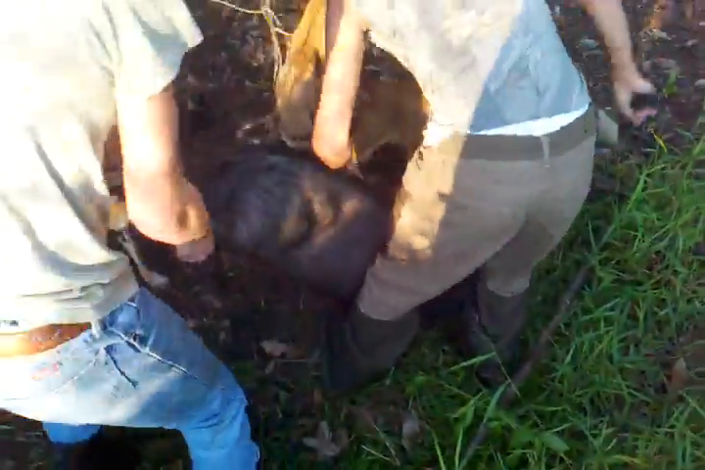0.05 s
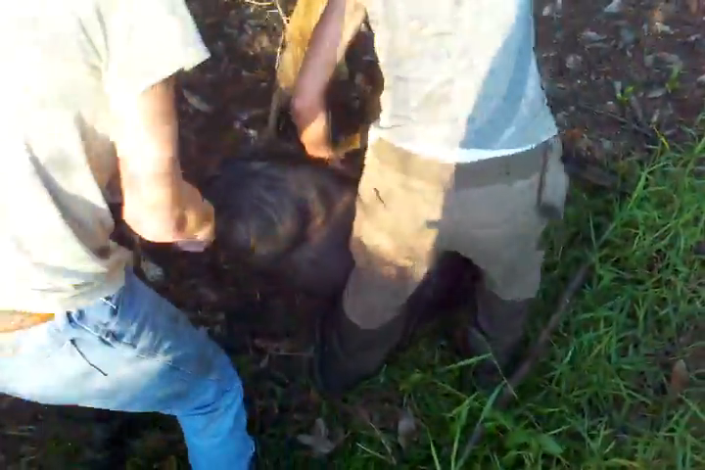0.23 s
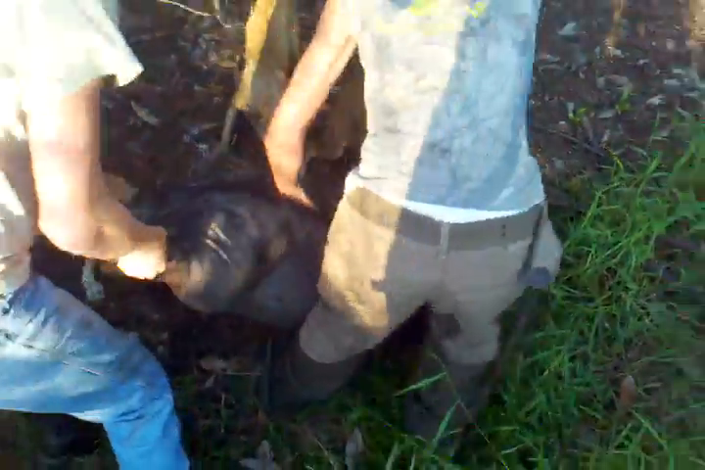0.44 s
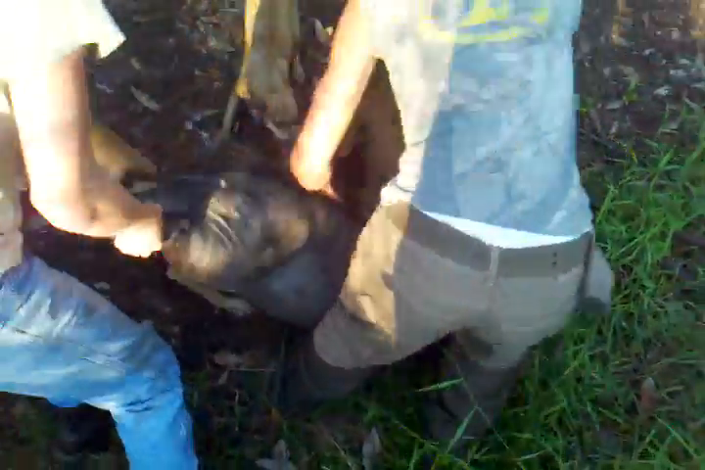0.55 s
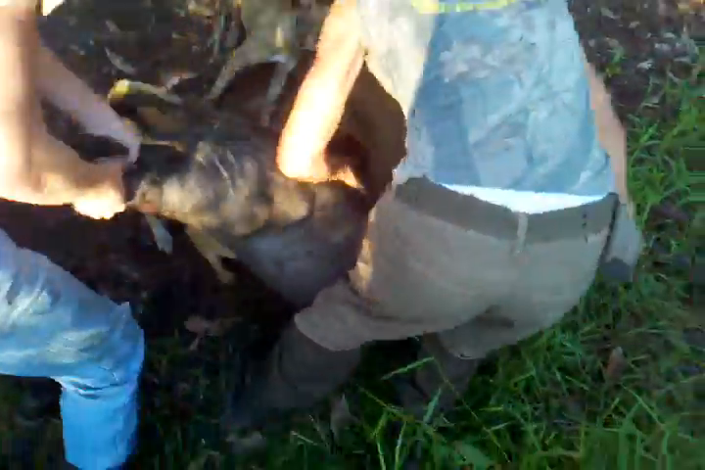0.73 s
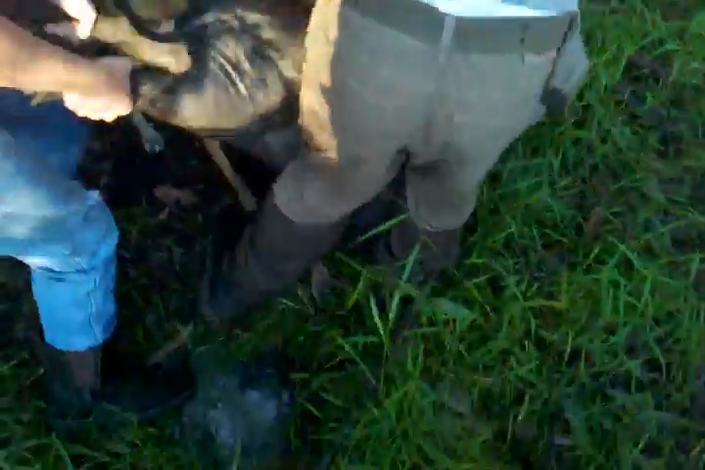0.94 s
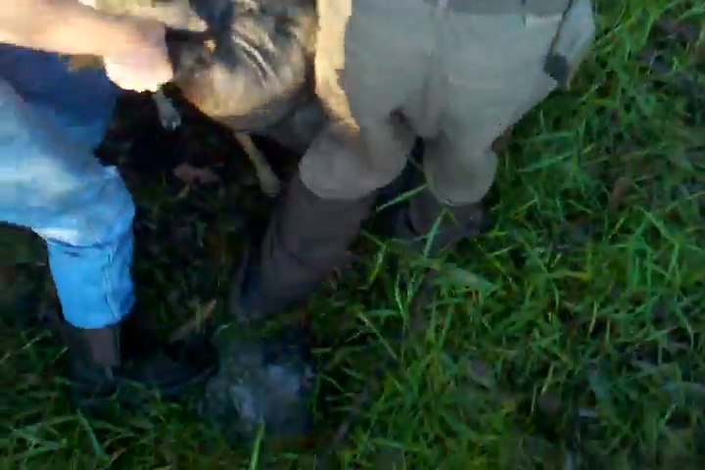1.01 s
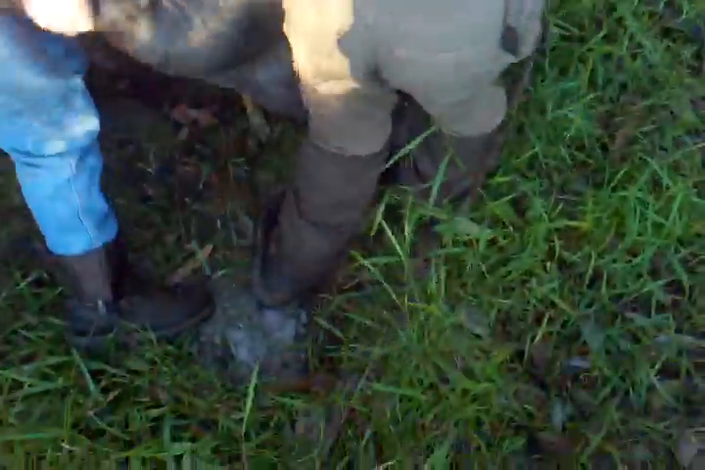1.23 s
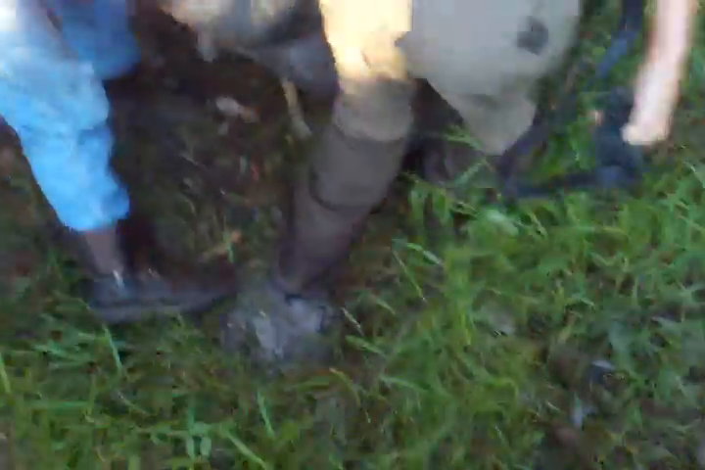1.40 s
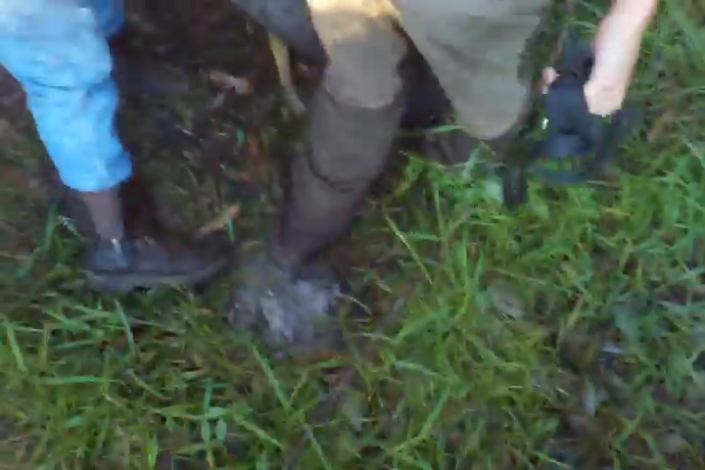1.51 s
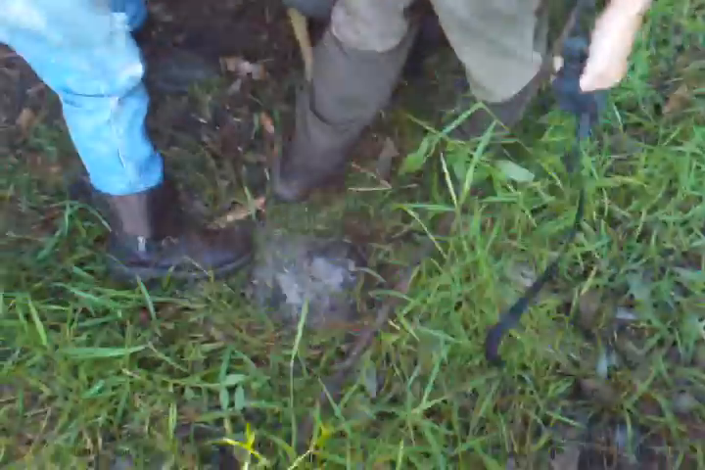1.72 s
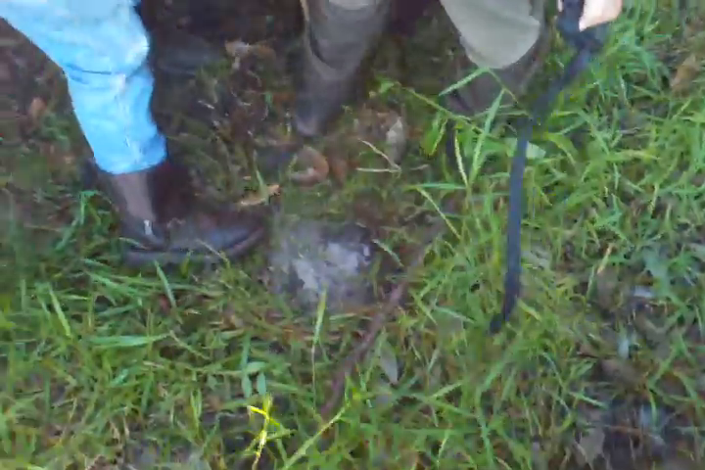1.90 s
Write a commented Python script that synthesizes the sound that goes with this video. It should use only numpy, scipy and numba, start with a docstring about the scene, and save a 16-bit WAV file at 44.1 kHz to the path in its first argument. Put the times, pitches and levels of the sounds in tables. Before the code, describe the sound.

Close outdoor stereo sound of a hog squealing: a shrill, rough, fluttering cry with breathy edges and brief low moans, rising slightly near its end, then sudden quiet with soft hiss, slight whine and ticks.

```python
"""Faint outdoor hiss comes first, then at once one long squeal: a hog held down in grass, close to a two-port microphone.
A high whistle of the vocal folds is chopped by a flutter locked to it; the same flutter gates a rasp of air
in the throat, mouth and upper resonances. A second tone, short moans and broad breath thicken the cry.
A few dull echoes follow it; a short whine and two ticks come at the end. All are shaped noise and sines."""
import sys
import numpy as np
from scipy import signal
from scipy.fft import rfft, irfft
from scipy.io import wavfile
from numba import njit

SR = 44100
rng = np.random.default_rng(int(sys.argv[2]) if len(sys.argv) > 2 else 0)


def generate_wav(signal):
    """Clip the signal to [-1, 1] and save it as 16-bit WAV at the path in sys.argv[1]."""
    frames = np.transpose(np.atleast_2d(signal))
    scaled = np.clip(frames, -1, 1) * 32767
    pcm = np.round(scaled).astype(np.int16)
    wavfile.write(sys.argv[1], SR, pcm)


def to_linear_factor(level_db):
    """Convert decibel levels (scalar or array-like) to linear amplitude factors."""
    exponent = np.asarray(level_db, float) / 20
    return 10 ** exponent


N = 85995

# outdoor hiss, spectrum shape: (frequency [Hz], relative level per Hz [dB])
HISS_SPECTRUM = [(60, -18), (150, 7), (300, 5), (800, 2), (1500, 7), (3000, -4), (5000, -1.5), (8000, 3.5),
                 (11000, -4), (14000, 1)]
# outdoor hiss, loudness before its slow swell: (time [s], level [dB])
HISS_LEVEL = [(0, -41.5), (.1, -39.5), (1.7, -45), (1.85, -48.5), (1.95, -49)]
# state of the folds: (time [s], noise share of the whistle's power [0-1], flutter depth [0-1],
# depth of strong-weak alternation [0-1])
FOLDS = [(0, .5, .2, .1), (.3, .3, .2, .05), (.53, .3, .4, .05), (.6, .2, .3, .1), (.64, .07, .08, .15),
         (.78, .12, .12, .15), (.85, .35, .25, .1), (1.0, .12, .24, 0), (1.27, .1, .18, 0),
         (1.35, .15, .08, .33), (1.43, .2, .1, .28), (1.52, .15, .15, .1), (1.59, .8, .25, .1)]
# throat resonance: (time [s], level before trim [dB], centre [Hz])
THROAT = [(0.04, -54.5, 590), (0.108, -26.5, 553), (0.192, -48, 570), (0.27, -43, 630), (0.826, -35.5, 600),
          (0.908, -29, 446), (0.954, -32, 510), (1.168, -29, 686.7), (1.264, -29, 741),
          (1.306, -31.5, 527.3), (1.356, -31.5, 705), (1.51, -29, 506.4), (1.556, -28, 810),
          (1.592, -42, 730), (1.672, -30.5, 801.8), (1.7, -67, 786.3)]
# mouth resonance above the whistle: (time [s], level before trim [dB], centre [Hz])
MOUTH = [(0.06, -80, 1920), (0.09, -34, 1840), (0.128, -22.5, 1840), (0.25, -29, 1650), (0.342, -21, 1776),
         (0.712, -21, 1716), (0.858, -21, 1830), (1.146, -29.5, 1600), (1.302, -23, 1831),
         (1.374, -20, 1619), (1.608, -24.5, 1630), (1.662, -20.5, 1661), (1.7, -84, 2020)]
# low strands near multiples of the flutter: (multiple of the flutter rate, level against STRAND_LEVEL [dB])
STRANDS = [(2, -5.5), (3, -1), (3.5, -3.5), (4, -3.5), (5.3, 0.5), (6, 5)]
# shared level of the strands: (time [s], level [dB])
STRAND_LEVEL = [(.07, -60), (.12, -46), (.3, -39.5), (.55, -39.5), (.68, -42), (.85, -37), (1.0, -34),
                (1.2, -36), (1.4, -35), (1.56, -38.5)]
# two upper resonances, before their swell:
# (time [s], lower level [dB], lower centre [Hz], top level [dB], top centre [Hz])
UPPER = [(0.08, -64, 4900, -64, 7460), (0.138, -43, 3970, -40.5, 7450), (0.34, -33, 4230, -35, 7600),
         (0.412, -40, 3950, -39, 7800), (0.54, -30.5, 4330, -32, 6800), (0.552, -32, 4070, -29, 7076),
         (0.674, -41.5, 4120, -29, 7400), (0.72, -32, 4100, -35, 6830), (0.874, -31, 4610, -28.5, 7560),
         (0.896, -38.5, 4745, -33, 7660), (0.996, -34, 4140, -30.5, 7400), (1.19, -36, 4190, -33, 7200),
         (1.27, -41, 4736, -28, 7800), (1.328, -32.5, 3850, -29.5, 7607), (1.374, -66, 4600, -32, 8500),
         (1.528, -41, 4710, -31.5, 6840), (1.572, -28, 4564, -31, 7680), (1.636, -65, 4510, -35, 7070),
         (1.654, -32, 4298, -33, 7018), (1.7, -78, 4188, -71, 7176)]
# narrow whistling edges in the breath: (mean centre [Hz], level against the top resonance before swell [dB])
EDGES = [(3400, -2.5), (4800, -9), (5400, -5), (6500, -3.5), (8300, -2.5)]
# broad breathiness of the cry, spectrum shape: (frequency [Hz], relative level per Hz [dB])
BREATH_SPECTRUM = [(90, -49), (200, 5.5), (500, 0.5), (1100, -10), (2300, 10), (3200, 6.5), (3750, -13.5),
                   (4500, -14), (5800, 6.5), (8500, 3.5), (9500, 4), (14000, -5)]
# broad breath, loudness: (time [s], level before BREATH_TRIM_DB [dB])
BREATH_LEVEL = [(.09, -83), (.125, -43.5), (.18, -42.5), (.45, -40.5), (.614, -35.5), (.75, -37.5),
                (.9, -42), (1.1, -40), (1.33, -38.5), (1.45, -40.5), (1.6, -35), (1.662, -38.5),
                (1.68, -78)]
# whistle of the folds: (time [s], pitch before waver [Hz], level [dB], octave level [dB])
WHISTLE = [(.09, 1309, -54, -44), (.17, 1321, -38, -34), (.26, 1329, -46, -42), (.3, 1324, -31, -35),
           (.33, 1348, -20.5, -51), (.37, 1325, -27, -39), (.47, 1332, -29.5, -34), (.52, 1330, -27, -25),
           (.58, 1300, -21.5, -29), (.62, 1290, -20.5, -27), (.655, 1323, -11, -25.5),
           (.7, 1325, -16.5, -30), (.745, 1295, -15, -38), (.8, 1337, -21, -43), (.825, 1353, -30, -31),
           (.855, 1376, -15, -26), (.895, 1405, -18.5, -32), (.925, 1379, -22, -27),
           (.97, 1375, -14, -26.5), (1.03, 1395, -10, -28), (1.11, 1393, -18, -26.5),
           (1.17, 1384, -16, -26.5), (1.21, 1405, -9.5, -19.5), (1.26, 1461, -15, -21.5),
           (1.32, 1437, -11.5, -34), (1.38, 1396, -11, -32), (1.42, 1440, -13.5, -35),
           (1.45, 1425, -14, -37), (1.485, 1434, -10, -28), (1.525, 1432, -19.5, -28),
           (1.56, 1468, -23, -34), (1.6, 1519, -17, -38), (1.63, 1391, -16, -30), (1.66, 1247, -21, -26),
           (1.68, 1155, -63, -53)]
# second, unsteady tone of the folds: (time [s], pitch before waver [Hz], level [dB])
SECOND = [(.1, 1510, -56), (.14, 1518, -23.5), (.2, 1487, -26), (.26, 1567, -32), (.3, 1725, -27.5),
          (.35, 1720, -21), (.42, 1705, -23), (.49, 1760, -28), (.53, 1714, -21), (.58, 1610, -16.5),
          (.67, 1594, -31), (.72, 1744, -25), (.79, 1732, -27), (.84, 1826, -34), (.88, 1854, -23),
          (.95, 1861, -30), (1.05, 1923, -39), (1.22, 1787, -41), (1.3, 1884, -25), (1.36, 2070, -37),
          (1.55, 1668, -43), (1.61, 1659, -11), (1.66, 1479, -37), (1.69, 1400, -67)]
# short low moans: (start [s], length [s], pitch before wobble [Hz], peak level before trim [dB])
MOANS = [(0.116, 0.027, 1018, -26), (0.852, 0.021, 572, -25), (0.87, 0.1, 440, -28.5),
         (0.955, 0.077, 582, -26.5), (1.437, 0.1, 466, -33.5), (1.627, 0.058, 790, -37)]
# whine after the cry: (time [s], centre [Hz], level [dB])
WHINE = [(1.72, 760, -63), (1.77, 800, -58), (1.8, 840, -54), (1.85, 930, -61)]
# ticks: (time [s], level of the ringing at its start [dB], frequency [Hz])
TICKS = [(1.713, -33, 13060), (1.7808, -22.5, 9500)]
# echoes off ground and bodies: (delay [s], level of the dulled cry [dB])
ECHOES = [(.006, -29), (.017, -15)]
# the two ports favour sum and difference in turn: (frequency [Hz], difference against sum [dB])
PORTS = [(30, 14), (90, 4), (200, -10), (900, -12), (1450, -26), (1900, -10), (2400, 3), (2780, 9),
         (3000, 26), (3500, 8), (3900, -6), (4450, -20), (5000, 0), (5850, 10), (6500, 1), (7350, -8),
         (8000, -1), (8800, 5), (9600, 0), (10300, -5), (11000, 1), (11800, 6), (12600, 0), (13300, -5),
         (14000, -3)]
# how far the difference is tied to the sum: (frequency [Hz], linked share of amplitude [dB])
PORT_LINK = [(100, -39), (280, -12), (400, -42), (1600, -32), (2300, -4), (3000, -61)]

WHISTLE_PER_FLUTTER = 7  # the whistle locks to the seventh multiple of the flutter
FLUTTER_JITTER = .13  # cycles, rms
OPEN_POWER = 1.6  # higher makes each opening of the folds briefer
SWELL_DB, SWELL_HZ = .5, 30  # rms spread and rate of the chop's swell
WAVER, WAVER_HZ = .008, 50  # rms share of the pitch and rate, for both tones of the folds
THROAT_PULSES, MOUTH_PULSES, UPPER_PULSES = .5, .36, .06  # amplitude weight of pulses in each rasp
# widths of a single resonance pass [Hz]
THROAT_WIDTH_HZ, MOUTH_WIDTH_HZ, STRAND_WIDTH_HZ = 400, 600, 75
UPPER_WIDTH_HZ, TOP_WIDTH_HZ, EDGE_WIDTH_HZ = 380, 600, 220
HALO_WIDTH_HZ, SECOND_WIDTH_HZ = 170, 90
THROAT_TRIM_DB, MOUTH_TRIM_DB, BREATH_TRIM_DB, MOAN_TRIM_DB = -3, -.5, 10, .5
EDGE_WANDER, EDGE_SWELL_DB, TREBLE_SWELL_DB = .02, 2.2, 1.5  # rms share of the centre; rms dB
BREATH_FLICKER_DB = 2.2  # rms
THIRD_DB = -33  # third partial against the whistle
PORT_TURN = -.26  # phase of the difference [rad]
PREAMP_CEILING = .64  # height at which the preamp rounds off
LOW_CUT_HZ, HIGH_CUT_HZ = 130, 13950


def in_time(rows):
    """Columns of a table, joined by straight lines in time."""
    s, *columns = np.transpose(rows)
    return [np.interp(np.arange(N) / SR, s, column) for column in columns]


def rms_one(x):
    """Scales to rms 1."""
    return x / np.sqrt(np.mean(x ** 2) + 1e-20)


def at_hz(points):
    """A dB spectrum as gains on the FFT grid, joined over log frequency."""
    hz, db = np.transpose(points)
    grid_hz = np.arange(N // 2 + 1) * SR / N
    return to_linear_factor(np.interp(np.log(grid_hz + 1), np.log(hz), db))


def drift(rate_hz):
    """Slow random wander of rms 1: noise through two equal low-pass poles."""
    r = np.exp(-2 * np.pi * rate_hz / SR)
    wander = signal.lfilter([1], [1, -2 * r, r * r], rng.standard_normal(N + SR // 2))
    return rms_one(wander[SR // 2:])  # drop the filter's run-in


@njit
def sweep(x, c, r):
    """Two-pole resonance with a moving centre."""
    y = np.zeros(len(x))
    for i in range(2, len(x)):
        y[i] = x[i] - x[i - 2] + r * c[i] * y[i - 1] - r * r * y[i - 2]
    return y


def resonance(x, hz, width_hz):
    """The moving resonance applied twice to each row; each row leaves at rms 1."""
    c = 2 * np.cos(2 * np.pi * hz / SR)
    r = np.exp(-np.pi * width_hz / SR)
    return np.array([rms_one(sweep(sweep(row, c, r), c, r)) for row in x])


def sounding(rows):
    """1 within the time span of a table, fading to 0 over 44 ms outside it."""
    t = np.arange(N) / SR
    inside = np.minimum(t - rows[0][0], rows[-1][0] - t)
    return np.clip(1 + inside / 0.044, 0, 1)


def outdoor_hiss():
    """Shaped noise, independent in front and sideways, with a slow swell."""
    level_db, = in_time(HISS_LEVEL)
    noise = rfft(rng.standard_normal((2, N))) * at_hz(HISS_SPECTRUM)
    return to_linear_factor(level_db + drift(6.7)) * rms_one(irfft(noise, N))


def fold_flutter():
    """Folds flutter at a seventh of the whistle: gives its phase, the rate, chop, openings and air pulses."""
    hz, _, _ = in_time(WHISTLE)
    _, depth, alternation = in_time(FOLDS)
    phase = 2 * np.pi * np.cumsum(hz * (1 + WAVER * drift(WAVER_HZ))) / SR
    rate = hz / WHISTLE_PER_FLUTTER
    cycle = phase / (2 * np.pi * WHISTLE_PER_FLUTTER) + FLUTTER_JITTER * drift(25)
    strong_weak = 1 + alternation * np.sqrt(2) * np.cos(np.pi * cycle)
    opening = (.5 + .5 * np.cos(2 * np.pi * cycle)) ** OPEN_POWER
    clicks = np.diff(np.floor(cycle), prepend=0)  # one sample per new cycle
    pulses = rms_one(clicks * strong_weak * to_linear_factor(2 * drift(125)))
    flutter = 1 + depth * rms_one(opening - opening.mean())
    chop = rms_one(flutter * strong_weak * to_linear_factor(SWELL_DB * drift(SWELL_HZ))) * np.sqrt(2)
    return phase, rate, chop, opening, pulses


def rasp(opening, pulses, share=0):
    """Air through the folds: sharp pulses mixed with noise that swells at each opening."""
    noise = rms_one(rng.standard_normal((2, N)) * (1.4 + opening))
    return share * pulses + (1 - share) * noise


def throat(opening, pulses):
    """Pulsed rasp ringing in the low, moving throat resonance."""
    db, hz = in_time(THROAT)
    ring = resonance(rasp(opening, pulses, THROAT_PULSES), hz, THROAT_WIDTH_HZ)
    return to_linear_factor(db + THROAT_TRIM_DB) * sounding(THROAT) * ring


def mouth(opening, pulses):
    """Pulsed rasp ringing in the mouth resonance just above the whistle."""
    db, hz = in_time(MOUTH)
    ring = resonance(rasp(opening, pulses, MOUTH_PULSES), hz, MOUTH_WIDTH_HZ)
    return to_linear_factor(db + MOUTH_TRIM_DB) * sounding(MOUTH) * ring


def low_strands(rate, opening, pulses):
    """Narrow bands of rasp that follow multiples of the flutter rate."""
    db, = in_time(STRAND_LEVEL)
    out = np.zeros((2, N))
    for multiple, strand_db in STRANDS:
        strand = resonance(rasp(opening, pulses), multiple * rate, STRAND_WIDTH_HZ)
        out += to_linear_factor(db + strand_db) * strand
    return out * sounding(STRAND_LEVEL)


def upper_resonances(opening, pulses):
    """Rasp in two treble resonances, the top one edged with narrow wandering whistles; all swell together."""
    db, hz, top_db, top_hz = in_time(UPPER)
    top = resonance(rasp(opening, pulses, UPPER_PULSES), top_hz, TOP_WIDTH_HZ)
    for edge_hz, edge_db in EDGES:
        centre_hz = edge_hz * (1 + EDGE_WANDER * drift(3.9))
        edge = resonance(rasp(opening, pulses), centre_hz, EDGE_WIDTH_HZ)
        top += to_linear_factor(edge_db + EDGE_SWELL_DB * drift(7.9)) * edge
    lower = resonance(rasp(opening, pulses, UPPER_PULSES), hz, UPPER_WIDTH_HZ)
    swell = to_linear_factor(TREBLE_SWELL_DB * drift(7))
    return sounding(UPPER) * swell * (to_linear_factor(db) * lower + to_linear_factor(top_db) * top)


def breath(opening, pulses):
    """Broad shaped rasp whose bands, about 1 kHz wide up to 15 kHz, flicker apart."""
    spectrum = rfft(rasp(opening, pulses, UPPER_PULSES)) * at_hz(BREATH_SPECTRUM)
    bins = N // 2 + 1
    band = np.arange(bins) * 22 // bins
    air = np.zeros((2, N))
    for k in range(15):
        air += to_linear_factor(BREATH_FLICKER_DB * drift(9)) * irfft(spectrum * (band == k), N)
    level_db, = in_time(BREATH_LEVEL)
    return to_linear_factor(level_db + BREATH_TRIM_DB) * sounding(BREATH_LEVEL) * rms_one(air)


def whistle(phase, chop, opening, pulses):
    """Chopped sines of the folds at three partials; the lower two trade power with a halo of noise."""
    hz, db, octave_db = in_time(WHISTLE)
    rough, _, _ = in_time(FOLDS)
    out = to_linear_factor(db + THIRD_DB) * chop * np.sin(3 * phase) * np.ones((2, 1))
    for partial, level_db in ((1, db), (2, octave_db)):
        halo = resonance(rasp(opening, pulses), partial * hz, HALO_WIDTH_HZ)
        tone = chop * np.sin(partial * phase)
        out += to_linear_factor(level_db) * (np.sqrt(1 - rough) * tone + np.sqrt(rough) * halo)
    return out * sounding(WHISTLE)


def second_tone(chop, opening, pulses):
    """Another unsteady pitch of the folds, chopped alike and turning to noise as they roughen."""
    hz, db = in_time(SECOND)
    rough, _, _ = in_time(FOLDS)
    tone = chop * np.sin(2 * np.pi * np.cumsum(hz * (1 + WAVER * drift(WAVER_HZ))) / SR)
    noise = resonance(rasp(opening, pulses), hz, SECOND_WIDTH_HZ)
    return to_linear_factor(db) * sounding(SECOND) * (np.sqrt(1 - rough) * tone + np.sqrt(rough) * noise)


def moans():
    """Short low sines with wobbling pitch and flat-topped rise and fall."""
    t = np.arange(N) / SR
    out = np.zeros(N)
    for start, length, hz, db in MOANS:
        phase = 2 * np.pi * np.cumsum(hz * (1 + 0.01424 * drift(26))) / SR
        swell = np.sin(np.pi * np.clip((t - start) / length, 0, 1)) ** 0.19
        out += to_linear_factor(db + MOAN_TRIM_DB) * swell * np.sin(phase)
    return out


def hog():
    """The whole cry: the layers of voice and air, most of them driven by one flutter."""
    phase, rate, chop, opening, pulses = fold_flutter()
    out = throat(opening, pulses) + mouth(opening, pulses)
    out += low_strands(rate, opening, pulses)
    out += upper_resonances(opening, pulses)
    out += breath(opening, pulses)
    out += whistle(phase, chop, opening, pulses)
    out += second_tone(chop, opening, pulses)
    return out + moans()


def echoes(cry):
    """Ground and bodies return the cry late and dulled by a one-pole low-pass."""
    dull = signal.lfilter([.4], [1, -.6], cry)
    out = np.zeros((2, N))
    for delay, db in ECHOES:
        late = int(delay * SR)
        out[:, late:] += to_linear_factor(db) * dull[:, :N - late]
    return out


def whine():
    """Noise in a narrow resonance gliding in pitch."""
    hz, db = in_time(WHINE)
    return to_linear_factor(db) * sounding(WHINE) * resonance(rng.standard_normal((2, N)), hz, 90)


def ticks():
    """Tiny impacts: a high sine with noise, both dying away within milliseconds."""
    t = np.arange(N) / SR
    out = np.zeros(N)
    for start, db, hz in TICKS:
        age = np.maximum(t - start, 0)
        ring = np.sin(2 * np.pi * hz * age) + 0.44 * rng.standard_normal(N)
        out += to_linear_factor(db) * (t >= start) * np.exp(-age / 0.00039) * ring
    return out


def scene():
    """Hiss, hog, echoes, whine and ticks; frontal and sideways rows share tones but not noise."""
    cry = hog()
    return outdoor_hiss() + cry + echoes(cry) + whine() + ticks()


def roll_off(x):
    """The treble ends steeply here."""
    return signal.sosfilt(signal.butter(12, 15290, fs=SR, output="sos"), x)


def record(dry):
    """Ports take front as sum and sideways as difference, by frequency; peaks are rounded, both ends cut."""
    front, sideways = rfft(dry)
    ratio = at_hz(PORTS)
    linked = np.clip(at_hz(PORT_LINK), 0, 1)
    blend = linked * front + np.sqrt(1 - linked ** 2) * sideways
    difference = ratio * np.exp(1j * PORT_TURN) * blend
    ports = (front + difference * [[1], [-1]]) / np.sqrt(1 + ratio ** 2)  # keeps the power even
    pair = irfft(ports, N)
    pair = PREAMP_CEILING * np.tanh(pair / PREAMP_CEILING)
    low_cut = signal.butter(3, LOW_CUT_HZ, "high", fs=SR, output="sos")
    high_cut = signal.ellip(12, .5, 70, HIGH_CUT_HZ, fs=SR, output="sos")
    mix = signal.sosfilt(high_cut, signal.sosfilt(low_cut, pair))
    return roll_off(mix)


dry = scene()
out = record(dry)
generate_wav(out)
```